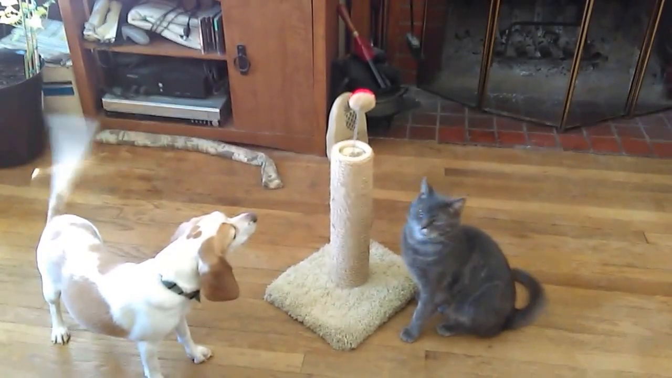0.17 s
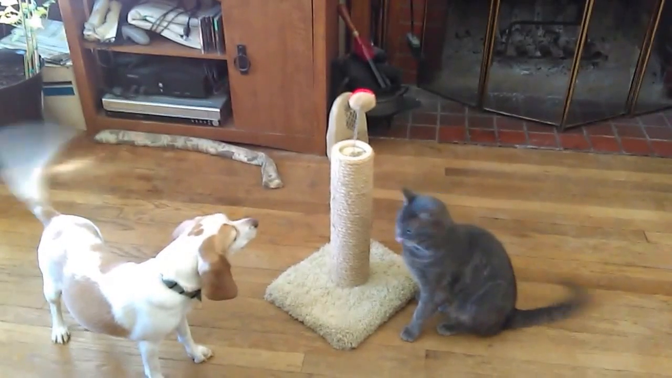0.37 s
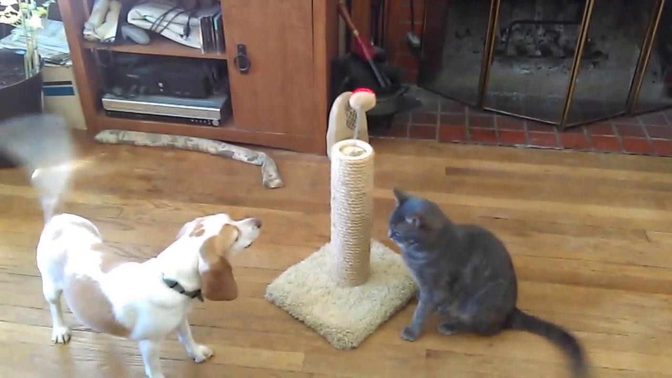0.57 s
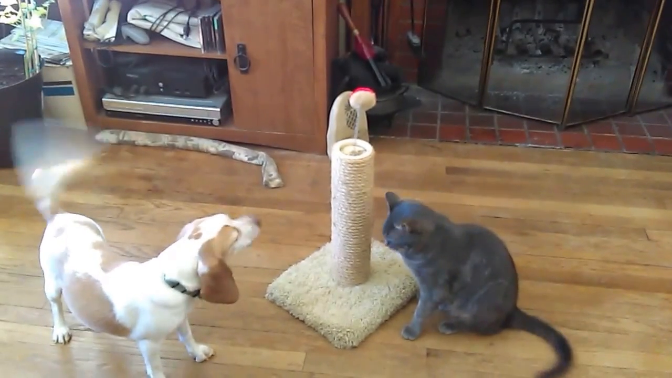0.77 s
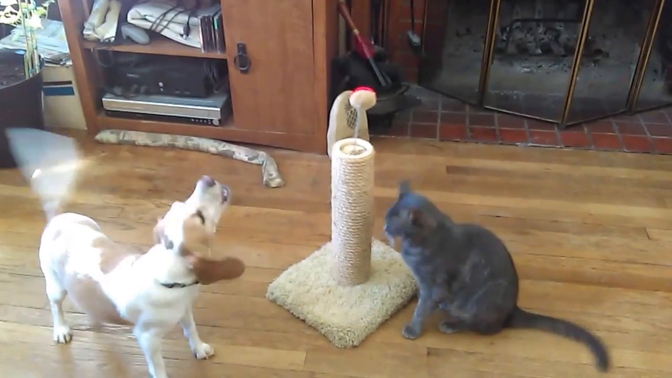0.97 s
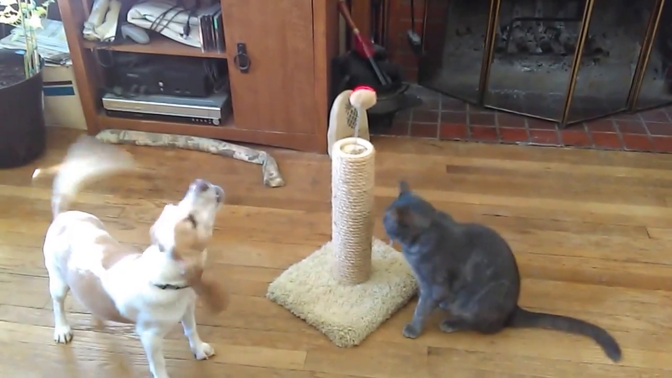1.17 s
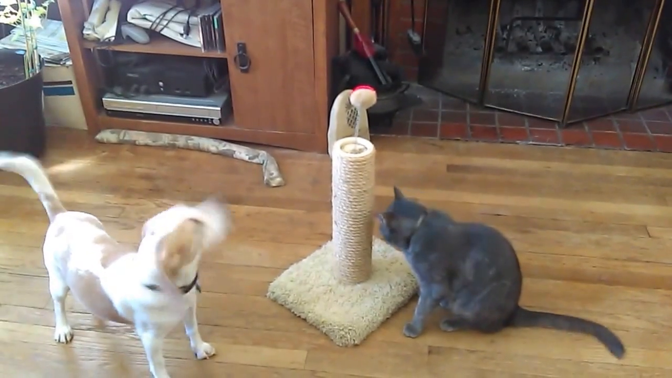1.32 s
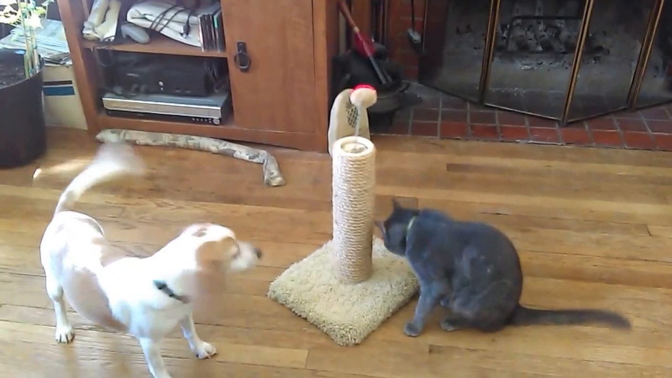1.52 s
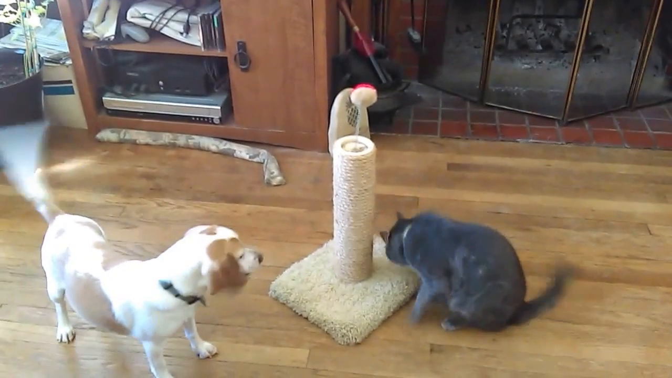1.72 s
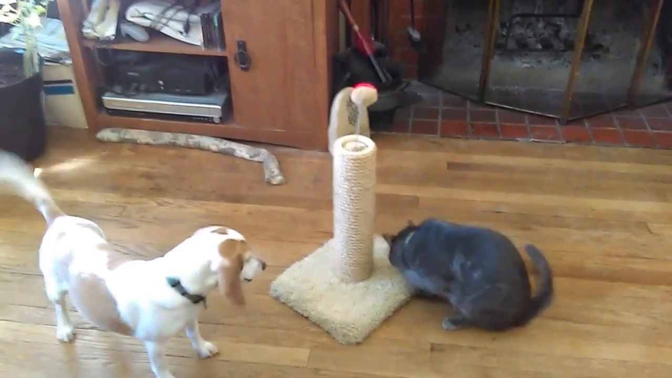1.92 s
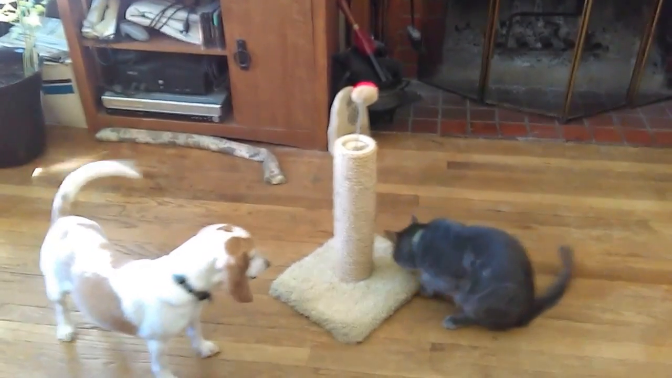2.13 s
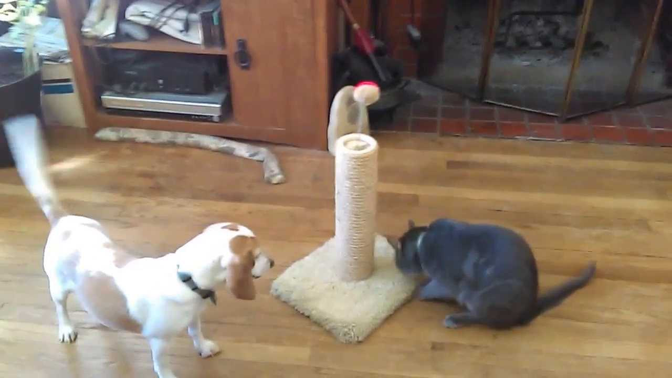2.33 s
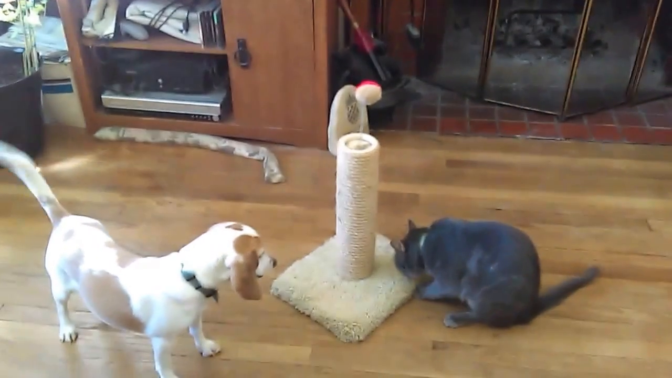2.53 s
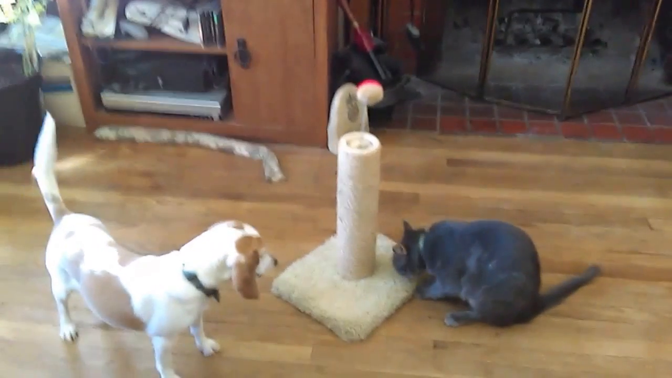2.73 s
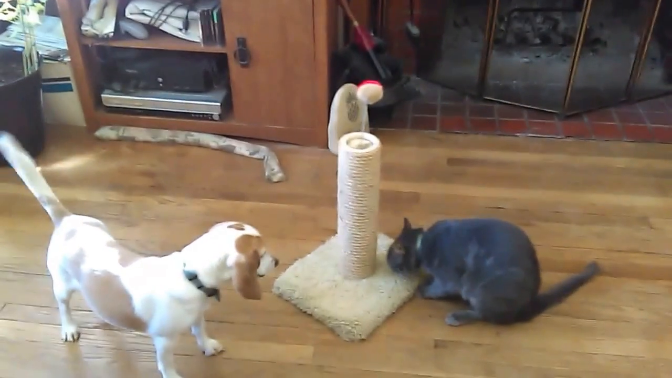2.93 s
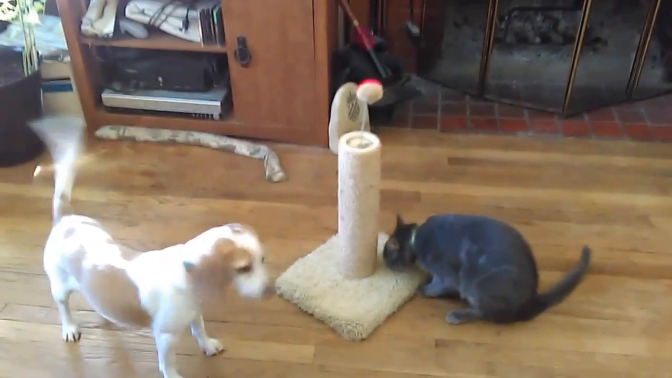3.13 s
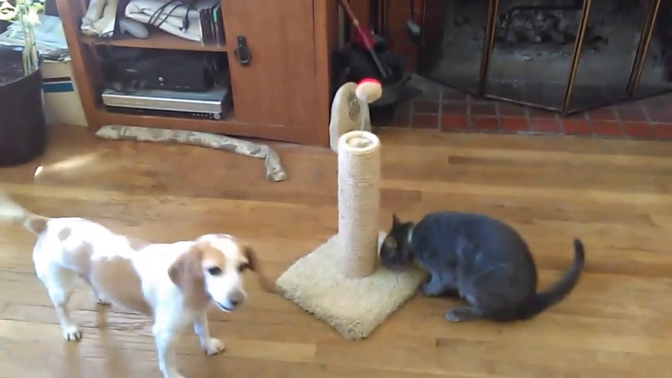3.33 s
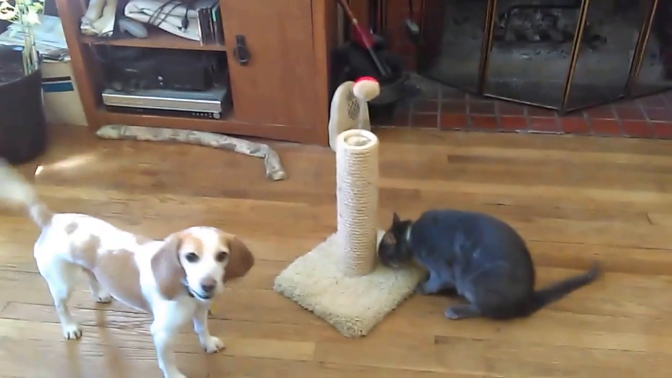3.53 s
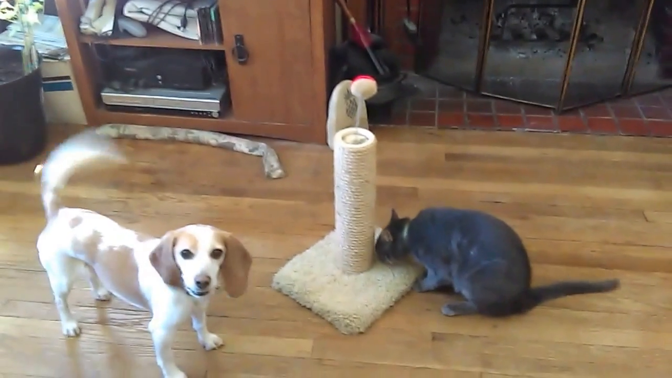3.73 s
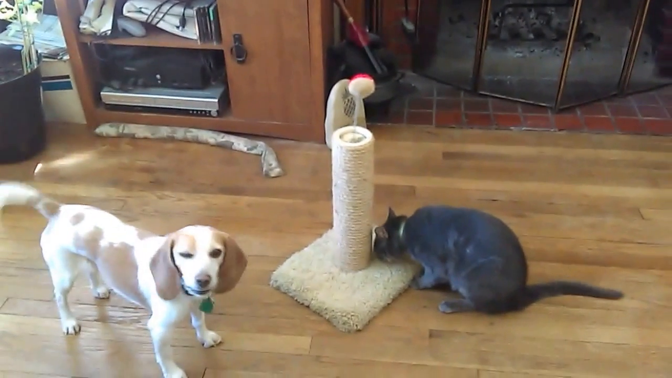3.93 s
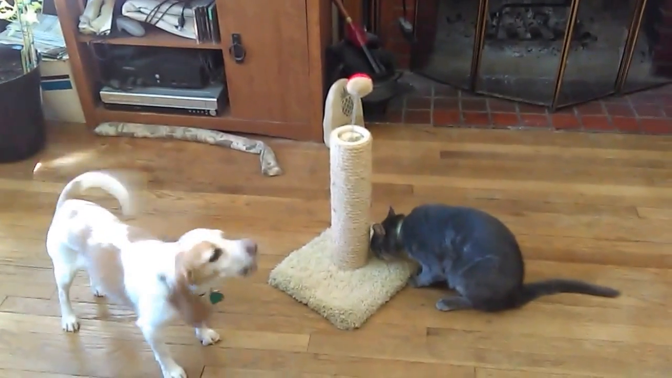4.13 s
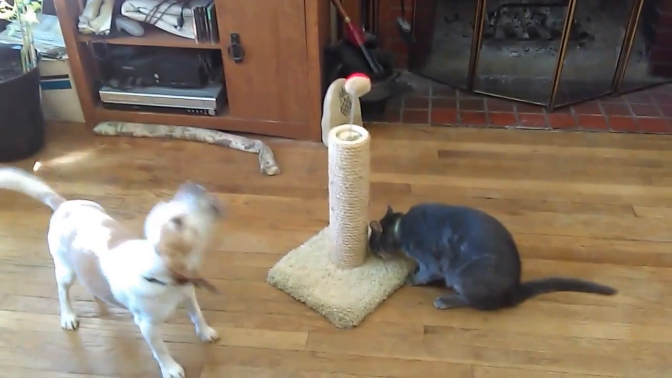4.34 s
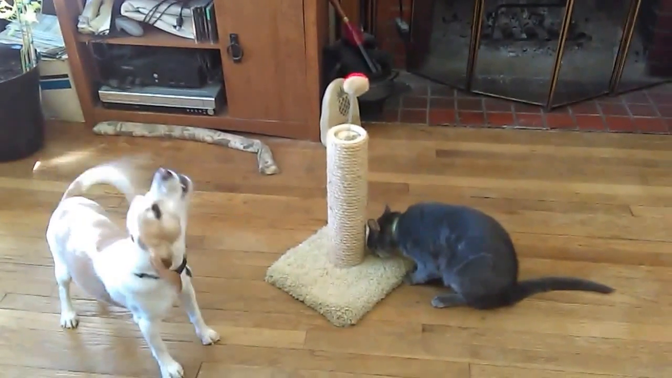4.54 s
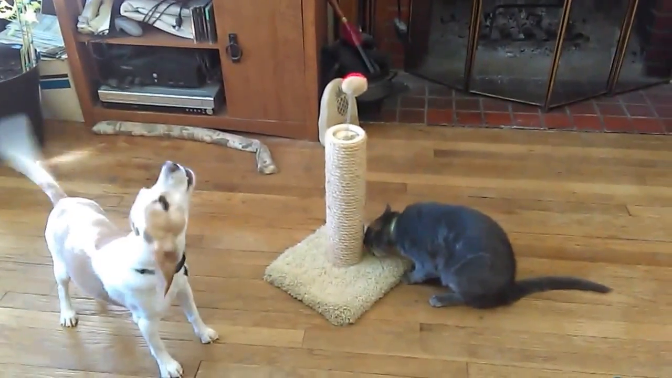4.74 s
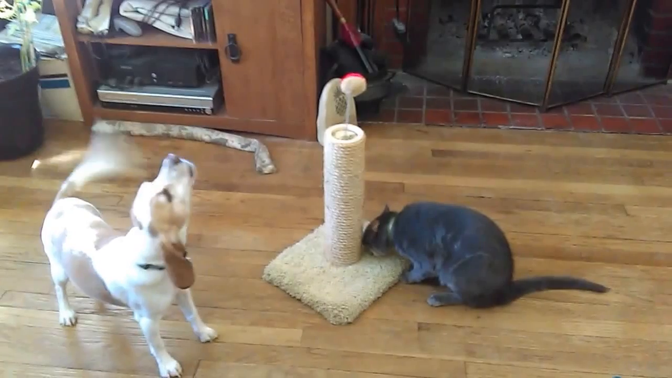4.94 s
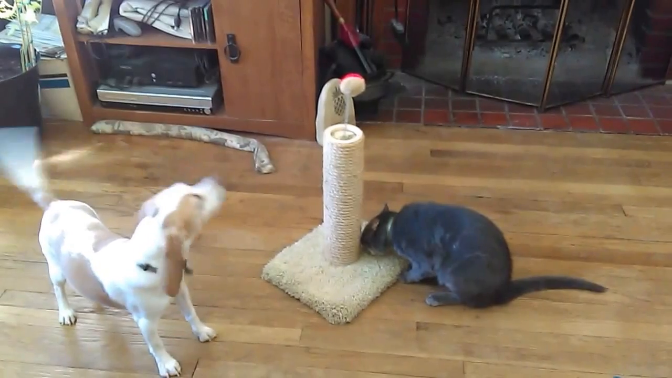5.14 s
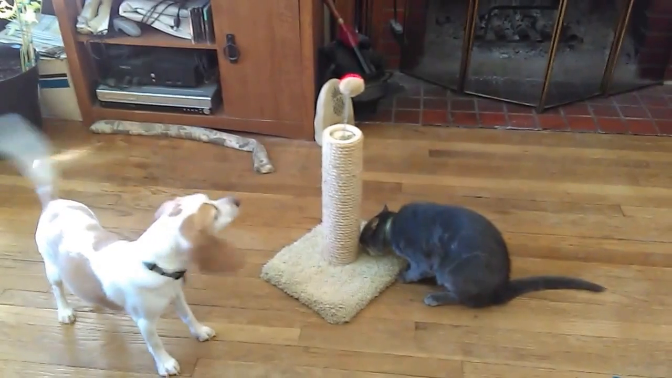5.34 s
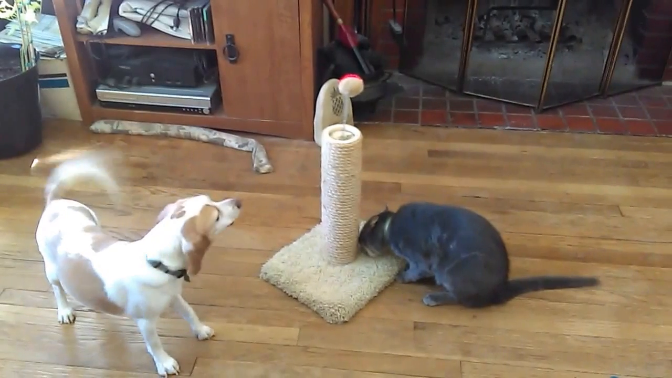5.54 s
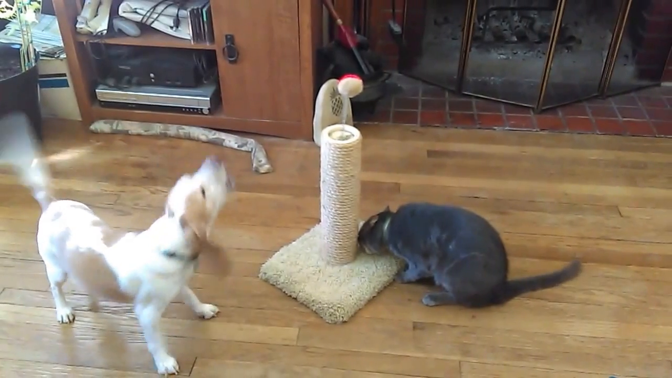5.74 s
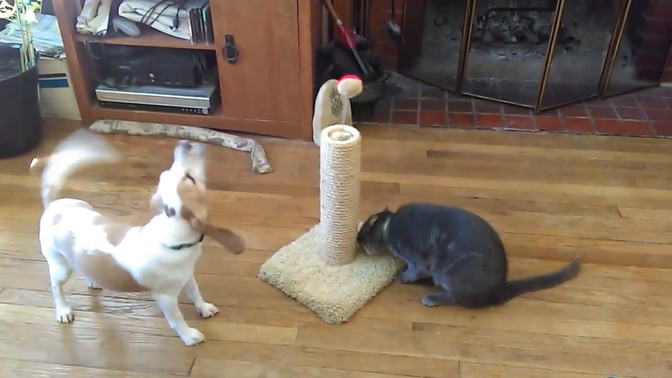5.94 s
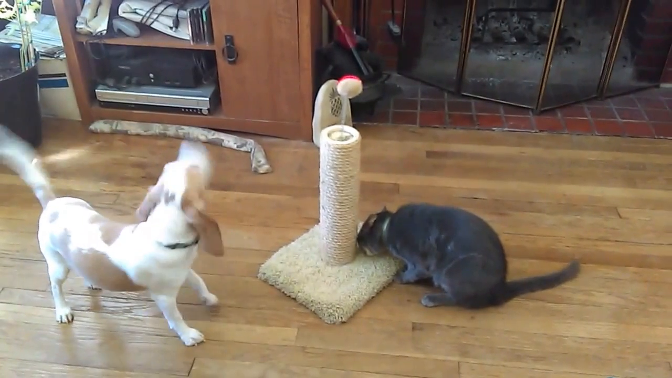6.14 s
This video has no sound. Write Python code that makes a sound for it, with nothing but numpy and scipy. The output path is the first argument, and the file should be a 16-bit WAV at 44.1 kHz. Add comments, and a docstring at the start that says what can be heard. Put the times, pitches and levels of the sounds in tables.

```python
"""A hound bays three times in a wooden-floored living room, a few steps from a small pair of microphones.
Each bay scoops up, cracks into rasp and half tones and slides down; the first two flip to a higher register.
The voice is a stack of overtones shaped by a moving throat, plus noise puffed once per cycle.
After the first bay come soft panting (noise through a mouth) and claws on the boards (bursts of grit).
Near echoes and a tail of sparse taps make the room; steady shaped noise makes its rumble and hiss."""
import sys
import numpy as np
from scipy import signal
from scipy.fft import rfft, irfft, next_fast_len
from scipy.io import wavfile
from scipy.ndimage import uniform_filter1d, minimum_filter1d

SR = 44100
rng = np.random.default_rng(int(sys.argv[2]) if len(sys.argv) > 2 else 0)


def inscribe(sig):
    """Save sig as 16-bit PCM at rate SR to the path in sys.argv[1].

    A 1-D sig is mono; a 2-D sig holds one channel per row.
    Samples are clipped to [-1, 1] before scaling.
    """
    pcm = np.round(np.clip(np.atleast_2d(sig).T, -1, 1) * 32767)
    wavfile.write(sys.argv[1], SR, pcm.astype(np.int16))


N = 272538

# one list per bay, the held line of the voice: time_s, effort_db, pitch_hz
BAYS = [
    [(.83, -2.5, 701), (.91, 5, 703.3), (.95, -11.5, 720.2), (1.04, -7.5, 686.7), (1.09, -15, 629.4),
     (1.138, -14, 616), (1.144, -12, 730.8), (1.2, -12.5, 776.6), (1.242, -24, 673.8), (1.272, -20, 511.4),
     (1.33, -45, 365.5), (1.39, -38.5, 327)],
    [(4.225, -7.5, 706.6), (4.33, -4.5, 710), (4.385, -18.5, 678.4), (4.46, -16.5, 587.9),
     (4.546, -18, 582.3), (4.553, -13.5, 722), (4.598, -9, 713.8), (4.625, -22.5, 654),
     (4.71, -20.5, 588.3), (4.83, -23, 606.5), (4.91, -25, 555.2), (5.04, -25.5, 440.9),
     (5.12, -32.5, 356.9), (5.25, -53, 350.3)],
    [(5.685, -9, 700.5), (5.84, -9, 692.9), (5.885, -13.5, 626.4), (6.05, -12, 614.8), (6.085, -10.5, 642),
     (6.12, -18.5, 644.4), (6.143, -12, 614), (6.161, -18.5, 521.8), (6.19, -13, 511.6)],
]
# how each bay begins: scoop_s, scoop_depth (share of pitch), swell_s, top_shine_db, first_rasp_db
STARTS = [(.07, .43, 0.07, 0.5, -10.5), (0.071, 0.361, 0.04, 5.5, -12.5), (.07, .45, .05, 3, -12.5)]
# voice cracks: start_s, length_s, pitch_drop (share), half_tones_db, rasp_db (against the clean tone)
CRACKS = [(.953, .033, .22, 0, -36.5), (1.14, .015, 0.0064, -17.5, -44), (1.37, .03, 0, -4, -25),
          (4.334, .042, .21, 4, -22), (5.235, 0.033, 0, 1.5, -5), (5.75, .03, 0.00046, -5.5, -19)]
# throat and mouth resonances: centre_hz, width_hz, rounded_db, wide_open_db
THROAT = [(169, 96, -5, -25.5), (359.9, 170, 5.5, -30), (710, 460, 4, -15.5), (771, 171, 3.5, 9),
          (1080, 150, -21.5, -0.5), (1286, 490, -14, -7), (1713, 200, -42.5, -8), (2044, 200, -41, -4),
          (2530, 900, -42, -11.5), (2946, 260, -29, -20), (3418, 300, -52, -25.5), (4690, 750, -58, -39.5),
          (5780, 350, -46.5, -43.5), (7203, 600, -46, -41), (8450, 340, -52, -36), (9940, 510, -46, -33),
          (10560, 370, -49.5, -44), (12246, 600, -59.5, -54)]
# brief dips of the band around the lowest tone: time_s, depth_db, width_s (at half depth)
DIPS = [(0.911, 14.5, 0.022), (0.95, 26.5, 0.007), (1.086, 13.5, 0.0084), (1.108, 9.5, 0.0075),
        (1.175, 16.5, 0.033), (4.426, 24.5, 0.0066), (4.616, 11.5, 0.0083), (4.778, 15, 0.021),
        (4.881, 18.5, 0.0089), (4.94, 12.5, 0.008), (5.772, 10, 0.0072), (5.824, 25, 0.0052),
        (5.876, 20.5, 0.0086), (6.085, 14, 0.019), (6.116, 11, 0.018), (6.146, 20.5, 0.012)]
# panting puffs: start_s, length_s, level_db, lower_resonance_hz, lower_resonance_db
PANTS = [(2.152, .75, -72, 1440, -3.5), (3.0, 0.25, -77, 1467, -8), (3.59, 0.31, -70.5, 1430, 2.5),
         (4.116, 0.062, -56.5, 1070, 6)]
# upper mouth resonances while panting: centre_hz, width_hz, level_db
PANT_MOUTH = [(2450, 570, 2), (3086, 230, -2)]
# claw scuffs: start_s, level_db, t60_s
CLAWS = [(1.8818, -57, 0.094), (1.9294, -62.5, 0.1), (2.5696, -53, 0.1), (2.6524, -60.5, 0.12),
         (2.9291, -65, 0.14), (3.1494, -65, 0.12), (3.9894, -58.5, 0.13)]
# colour of a claw on the board: freq_hz, level_db
BOARD_COLOUR = [(150, -7.5), (600, 6), (2000, 4), (4000, -1.5), (12000, -19)]
# near echoes off floor and walls: left_s, right_s, left_db, right_db
ECHOES = [(.0035, .0031, -9.5, -10.5), (.007, .0075, -18.5, -9), (.011, .0104, -18, -8),
          (.016, .0166, -14, -12.5), (.023, .0222, -4, -24.5)]
# decay of the room tail: freq_hz, t60_s
ROOM_DECAY = [(150, 0.28), (400, 0.18), (900, .38), (1500, 0.39), (3000, 0.31), (8000, .28), (15000, 0.39)]
# spectrum shape of rumble and hiss: freq_hz, density_db (per Hz, relative)
FLOOR_COLOUR = [(20, -17), (40, -8.5), (70, 6.5), (130, -4), (220, 0), (350, -9), (600, -11), (1000, -15),
                (2500, -16), (5000, -19.5), (8500, -20), (11000, -23), (13000, -27.5), (15500, -30)]
# left-right likeness of rumble and hiss: freq_hz, likeness (0-1)
FLOOR_LIKENESS = [(60, 0.49), (160, 0.43), (410, 0.43), (1060, 0.023), (2770, 0.0)]
# tone of the left port: freq_hz, level_db
LEFT_TONE = [(100, 1), (600, 1.5), (1200, -4.5), (2000, -8.5), (4000, -13), (8000, -9), (12000, -1)]

SWELL_DB = -40  # a bay swells from this far below its effort
# the jaw snaps open, then settles; gapes run from 0 rounded to 1 wide open
OPEN_S, CLOSE_S, GAPE_START, GAPE_REST, GAPE_CRACK = 0.039, .09, .4, .22, 0.15
# the lips round as the pitch sinks towards ROUND_HZ; resting gape is reached one span above it
ROUND_HZ, ROUND_SPAN_HZ = 470, 139.3
SHINE_LATE_DB, SHINE_S = -24, 0.12  # the top overtones come in late
RASP_FADE_DB_PER_S, RASP_REST_DB = 199, -49.5  # rest is against the clean tone
SLACK_HZ, SLACK_DB_PER_HZ = 516, 0.2239  # slack folds rasp more below this pitch
HALF_START_DB, HALF_FADE_DB_PER_S, HALF_REST_DB = -28, 50, -44
SNAP_S, BREAK_DB_PER_S, CALM_DB_PER_S = .008, 1999, 401  # a crack breaks in fast and calms slowly
# rms shares of the pitch: start and crack flutter add to the resting one
FLUTTER_START, FLUTTER_S, FLUTTER_REST, FLUTTER_CRACK = 0.014, 0.13, .003, 0.02
SHINE_EDGE_HZ = 4200  # overtones and resonances above this count as the top
FLOOR_DB = -62
LAG_S = .00025  # sound reaches the right port this much later
CEILING, EDGE_HZ = .9, 15700  # limiter peak, band limit


def dog():
    """The bays: folds give tone and rasp together, driven by effort and silent in between."""
    t = np.arange(N) / SR
    effort_db, pitch_hz, gape, shine_db, rasp_db, half_db, flutter = gestures(t)
    wobble = uniform_filter1d(uniform_filter1d(rng.standard_normal(N), size=120), size=120)
    turns = np.cumsum(pitch_hz * (1 + flutter * evened(wobble))) / SR
    tone = overtones(t, turns, pitch_hz, gape, shine_db, half_db)
    voice = tone + gain_of(rasp_db) * rasp(turns, gape)
    on = sum((t >= rows[0][0]) & (t < rows[-1][0]) for rows in BAYS)
    gate = uniform_filter1d(on * 1., size=350)  # 8 ms edges
    return gain_of(effort_db) * gate * voice


def gestures(t):
    """Effort, pitch, gape, shine, rasp, half tones and flutter, from the age of the bay and its cracks."""
    time_s, effort_db, held_hz = np.transpose(np.concatenate(BAYS))
    effort_db, held_hz = np.interp(t, time_s, effort_db), np.interp(t, time_s, held_hz)
    starts = np.array([rows[0][0] for rows in BAYS])
    bay = np.maximum(np.searchsorted(starts, t + .05) - 1, 0)  # takes its posture 50 ms ahead
    age = np.maximum(t - starts[bay], 0)
    scoop_s, scoop, swell_s, shine_db, first_db = np.transpose(STARTS)[:, bay]

    start, length, drop, crack_half_db, crack_rasp_db = np.transpose(CRACKS)[..., None]
    cracked = np.clip(np.minimum(t - start, start + length - t) / SNAP_S + .5, 0, 1)
    before, after = np.maximum(start - t, 0), np.maximum(t - start - length, 0)
    away_db = BREAK_DB_PER_S * before + CALM_DB_PER_S * after

    def remaining(span):
        """Falls from 1 to 0 over the first span seconds of a bay."""
        return np.clip(1 - age / span, 0, 1)

    pitch_hz = held_hz * (1 - scoop * remaining(scoop_s) ** 1.6) * (1 - (drop * cracked).sum(0))

    rest = GAPE_REST * np.clip((held_hz - ROUND_HZ) / ROUND_SPAN_HZ, .12, 2.5)
    gape = rest + (1 - rest) * np.exp(-(np.maximum(age - OPEN_S, 0) / CLOSE_S) ** 2)
    gape = gape - (1 - GAPE_START) * remaining(OPEN_S) ** 2
    gape = gape + GAPE_CRACK * (cracked * (drop > 0)).sum(0)

    # the strongest cause of rasp or half tones wins
    slack_db = RASP_REST_DB + SLACK_DB_PER_HZ * np.maximum(SLACK_HZ - held_hz, 0)
    rasp_db = np.max([first_db - RASP_FADE_DB_PER_S * age, slack_db, *(crack_rasp_db - away_db)], 0)
    fading_db = np.maximum(HALF_START_DB - HALF_FADE_DB_PER_S * age, HALF_REST_DB)
    half_db = np.max([fading_db, *(crack_half_db - away_db)], 0)

    flutter = FLUTTER_REST + FLUTTER_START * np.exp(-age / FLUTTER_S) + FLUTTER_CRACK * cracked.sum(0)
    shine_db = shine_db + SHINE_LATE_DB * remaining(SHINE_S)
    effort_db = effort_db + SWELL_DB * remaining(swell_s) ** 2
    return effort_db, pitch_hz, gape, shine_db, rasp_db, half_db, flutter


def overtones(t, turns, pitch_hz, gape, shine_db, half_db):
    """Overtones read off the throat, with half tones between them from strong-weak beats of the folds."""
    coarse = slice(0, N, 64)  # slow curves need few points
    tone, power = np.zeros(N), 0
    shape = throat(gape[coarse])
    flicker = rng.standard_normal((48, len(t[coarse])))
    flicker = evened(uniform_filter1d(flicker, size=24, axis=1))
    for k in np.arange(1, 48) / 2:
        is_half = k % 1 > 0
        if k > 8 and is_half:
            continue
        f = k * pitch_hz[coarse]
        level_db = shine_db[coarse] * (f > SHINE_EDGE_HZ)
        level_db = level_db + (half_db[coarse] - 1.1 * k) * is_half
        level_db = level_db - 16.0 * (k < 1)  # the lowest half tone barely radiates
        level_db = level_db + 4.8 * (k > 2) * flicker[int(2 * k)]  # upper overtones flicker, each alone
        height = peaks(shape, f) * gain_of(level_db)
        power = power + height ** 2 / 2
        tone += np.interp(t, t[coarse], height) * np.cos(2 * np.pi * k * turns + k * k)
    return tone / np.interp(t, t[coarse], np.sqrt(power))


def rasp(turns, gape):
    """Breath noise puffed once a cycle, blended between the rounded and the wide open throat."""
    puffs = (.3 + np.exp(-(turns % 1) / .3)) * rng.standard_normal(N)

    def through(g):
        """The puffs through a fixed gape, tilted up towards the treble."""
        return evened(coloured(puffs, lambda f: peaks(throat(g), f) * gain_of(5.1 * np.log2(f / 700 + .1))))

    rounded, wide = through(0), through(1)
    return rounded + np.clip(gape, 0, 1) * (wide - rounded)


def throat(gape):
    """Resonances for a mouth between rounded and wide open; the high ones sink and spread as it opens."""
    gape = np.clip(gape, 0, 1)
    modes = []
    for f, width, rounded_db, wide_db in THROAT:
        opening = gape * (f > SHINE_EDGE_HZ)
        level_db = rounded_db + gape * (wide_db - rounded_db)
        modes.append((f * (1 - 0.057 * opening), width * (1 + 2.7 * opening), level_db))
    return modes


def panting():
    """Puffs of turbulent air through the resonances of the dog's mouth."""
    out, air = np.zeros(N), rng.standard_normal(N)
    for s, length, db, hz, low_db in PANTS:
        at = slice(round(s * SR), round((s + length) * SR))
        mouth = [(hz, 550, low_db), *PANT_MOUTH]
        puff = coloured(air[at], lambda f: peaks(mouth, f))
        flow = uniform_filter1d(uniform_filter1d(air[at][::-1], size=1500), size=1500)
        puff = puff * gain_of(3.5 * evened(flow))  # uneven flow
        out[at] += gain_of(db) * evened(puff) * signal.windows.tukey(len(puff), .25)
    return out


def claws():
    """Short scuffs: a burst of grit that swells in a few ms and dies on the board."""
    out, t = np.zeros(N), np.arange(8000) / SR
    grit = rng.standard_normal((len(CLAWS), len(t)))
    grit = evened(coloured(grit, lambda f: gain_of(read(BOARD_COLOUR, f))))
    swell = np.minimum(t / 0.0023, 1)
    for (s, db, t60), burst in zip(CLAWS, grit):
        out[round(s * SR):][:len(t)] += gain_of(db - 60 * t / max(t60, .02)) * swell * burst
    return out


def dipped(x):
    """Lowers the band of the lowest tone for a moment at each dip."""
    t = np.arange(N) / SR
    dip_db = sum(db * np.exp(-((t - s) / w) ** 2 * np.log(16)) for s, db, w in DIPS)
    low = coloured(x, lambda f: 1 / (1 + ((f - 650) / 260) ** 6))
    return x + (gain_of(-dip_db) - 1) * low


def room(x):
    """Near echoes off floor and walls, then a tail of sparse taps that dies band by band."""
    taps = np.zeros((2, SR // 2))
    at = np.arange(500, SR // 2 - 20, 20) + rng.integers(0, 20, (2, (SR // 2 - 501) // 20))
    np.put_along_axis(taps, at, rng.choice([-1., 1.], at.shape), 1)
    taps[0] = 2.5 * taps[0] + 0.18 * taps[1]  # the ports share part of the tail
    hz, t, z = signal.stft(taps, SR, nperseg=256)
    decay = gain_of(-60 * t / read(ROOM_DECAY, hz)[:, None])
    tail = signal.istft(z * decay, SR, nperseg=256)[1]
    tail /= np.linalg.norm(tail, axis=1, keepdims=True)  # as strong as the direct sound
    for left_s, right_s, left_db, right_db in ECHOES:
        tail[[0, 1], [round(left_s * SR), round(right_s * SR)]] += gain_of([left_db, right_db])
    return signal.fftconvolve(x[None], tail, axes=1)[:, :N]


def floor():
    """Rumble of the house and hiss: shaped noise, partly alike in both ports, with soft lumps."""
    frames, hz = N // 256 + 5, np.fft.rfftfreq(1024, 1 / SR)
    a, b, c, d, lumps = rng.standard_normal((frames, 513, 5)).T
    lumps = evened(uniform_filter1d(uniform_filter1d(lumps, size=10, axis=0), size=12, axis=1))
    same = read(FLOOR_LIKENESS, hz)[:, None]
    right = a + 1j * b
    left = same * right + np.sqrt(1 - same ** 2) * (c + 1j * d)
    z = np.array([left, right]) * gain_of(read(FLOOR_COLOUR, hz)[:, None] + .8 * lumps)
    noise = signal.istft(z, nperseg=1024, noverlap=768)[1][:, :N]
    return gain_of(FLOOR_DB) * evened(noise)


def gain_of(db):
    """Decibels to a factor."""
    return 10 ** (np.asarray(db) / 20)


def evened(x):
    """Scales to rms 1."""
    return x / np.sqrt(np.mean(x ** 2) + 1e-20)


def read(points, hz):
    """Reads a spectrum on a log-frequency axis."""
    f, value = np.transpose(points)
    return np.interp(np.log(hz + 1), np.log(f + 1), value)


def peaks(modes, hz):
    """Gain at hz of resonances with steep skirts, summed as power."""
    return np.sqrt(sum(gain_of(2 * db) / (1 + (2 * (hz - f) / w) ** 2) ** 3 for f, w, db in modes))


def coloured(x, gain):
    """Filters along time by gain(hz)."""
    size = next_fast_len(x.shape[-1] + 2048)
    return irfft(rfft(x, size) * gain(np.fft.rfftfreq(size, 1 / SR)), size)[..., :x.shape[-1]]


def scene():
    """Dog and claws, direct and through the room, over the rumble and hiss."""
    near = dog() + panting() + claws()
    left, right = dipped(near + room(near))
    late_right = coloured(right, lambda f: np.exp(-2j * np.pi * f * LAG_S))
    return np.array([left, late_right]) + floor()


def record(dry):
    """The left port is duller in the upper middle; a limiter holds the peaks; band limit."""
    ports = np.array([coloured(dry[0], lambda f: gain_of(read(LEFT_TONE, f))), dry[1]])
    ports = ports + 0.0085 * ports ** 2  # a slightly lopsided capsule thumps with the level
    headroom = np.minimum(CEILING / (abs(ports).max(0) + 1e-9), 1)
    held = ports * uniform_filter1d(minimum_filter1d(headroom, size=441), size=441)
    band = signal.firwin(511, EDGE_HZ, window=("kaiser", 9), fs=SR)
    return signal.oaconvolve(held, band[None], "same")


dry = scene()
out = record(dry)
inscribe(out)
```